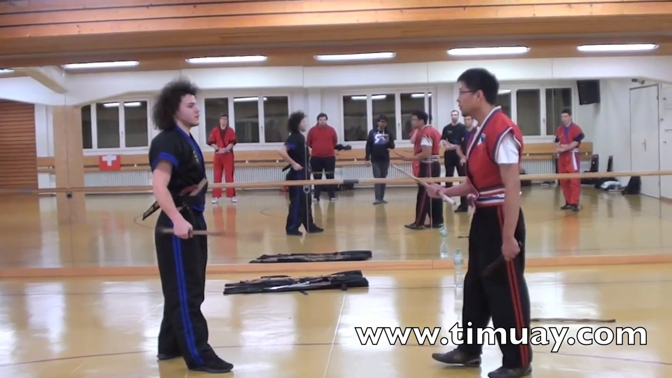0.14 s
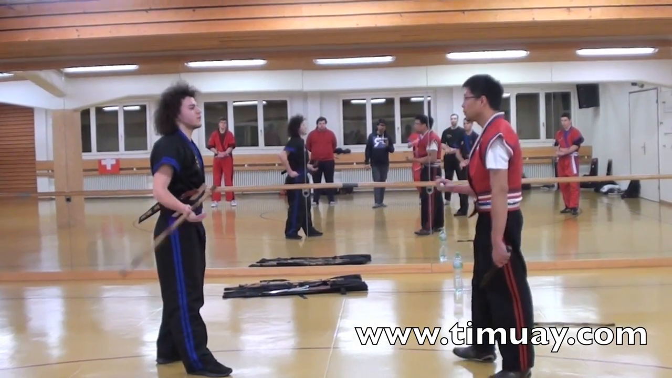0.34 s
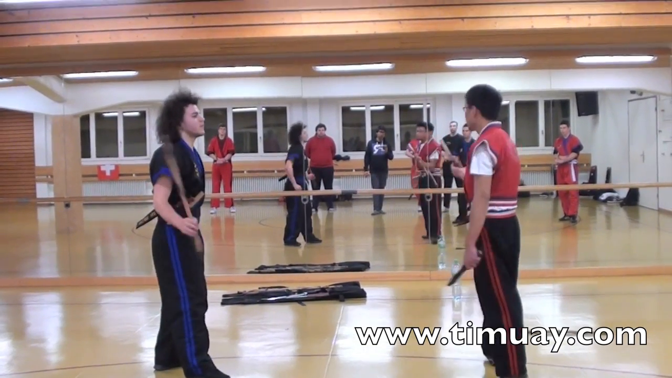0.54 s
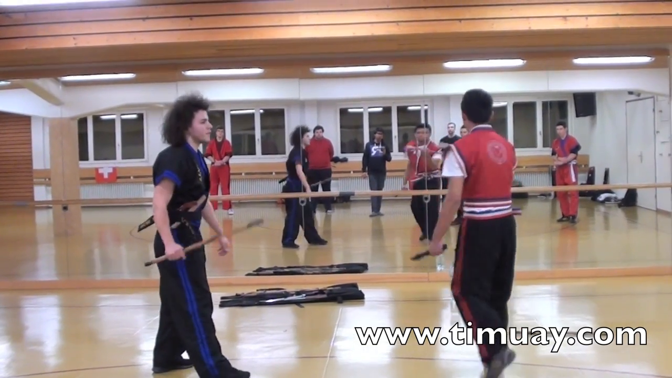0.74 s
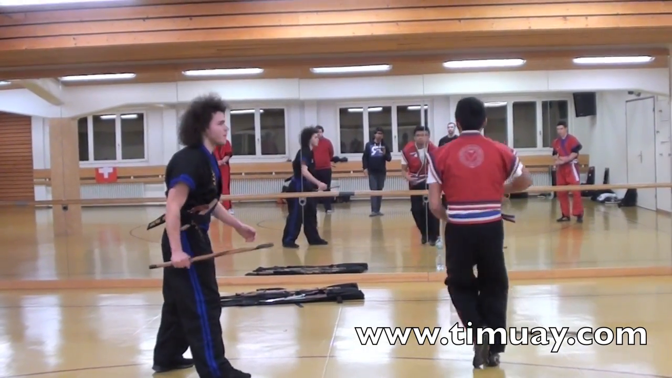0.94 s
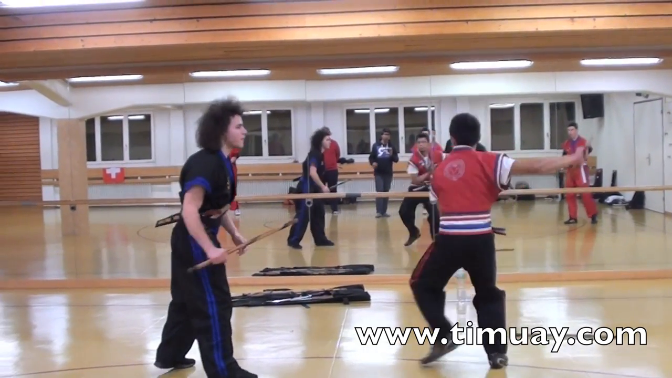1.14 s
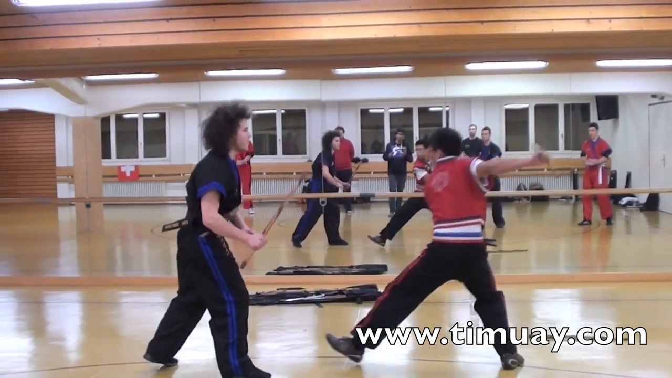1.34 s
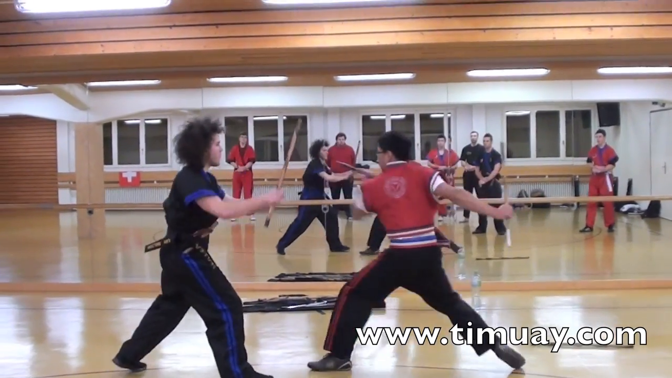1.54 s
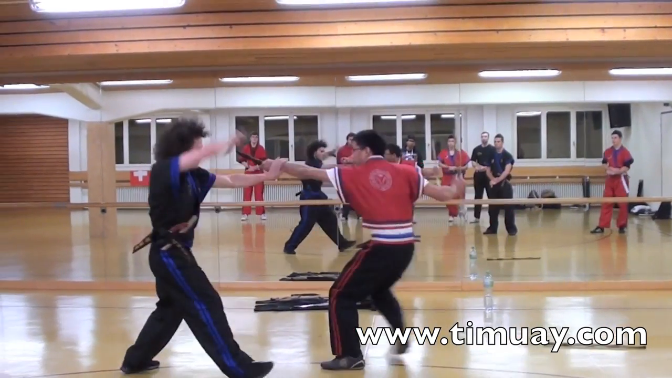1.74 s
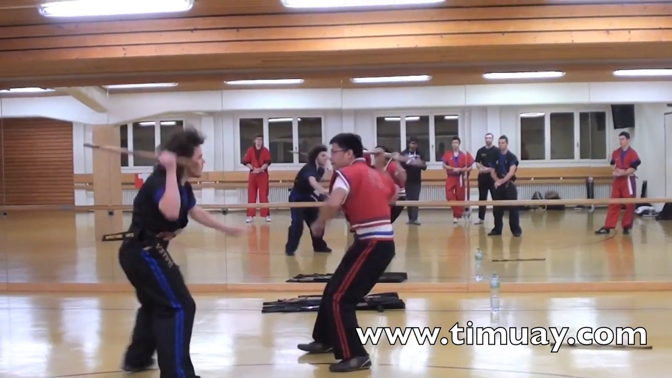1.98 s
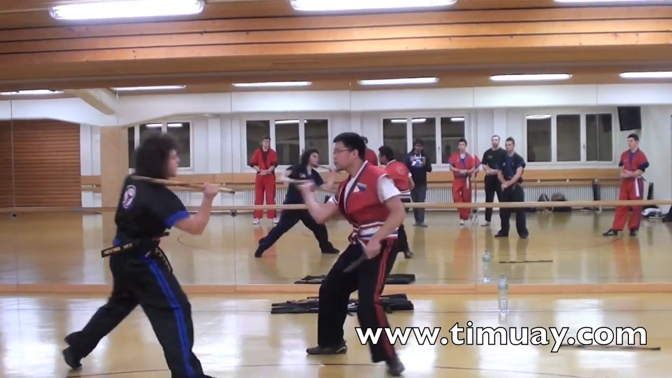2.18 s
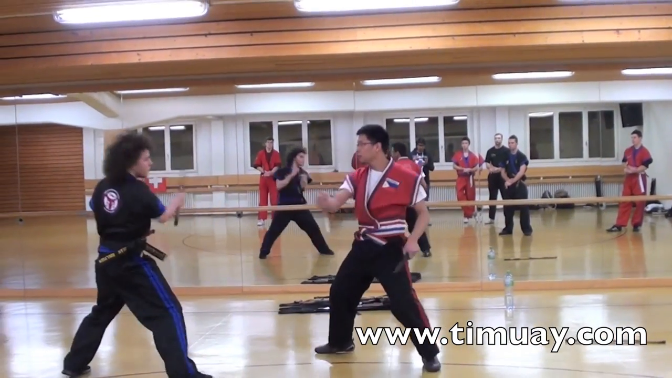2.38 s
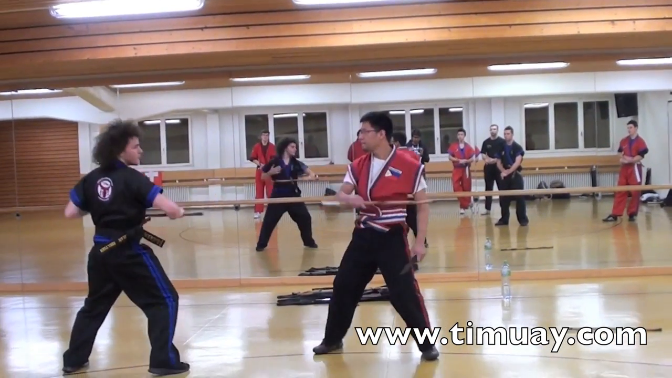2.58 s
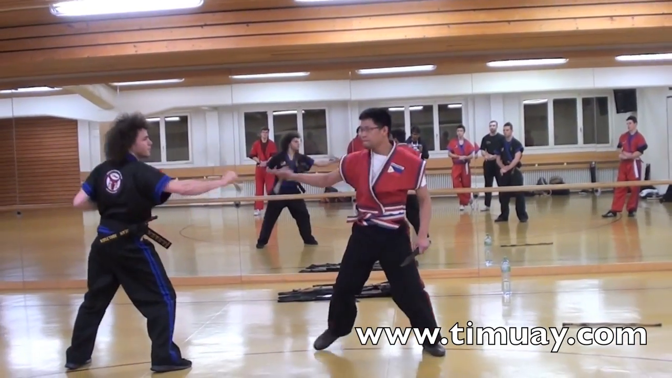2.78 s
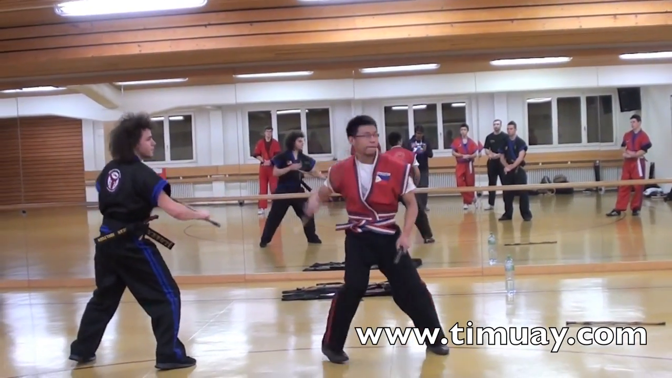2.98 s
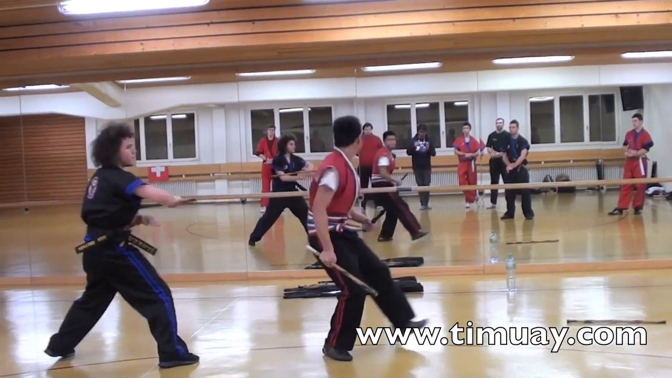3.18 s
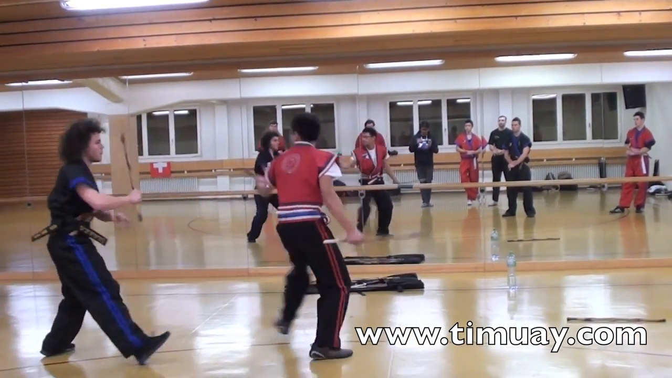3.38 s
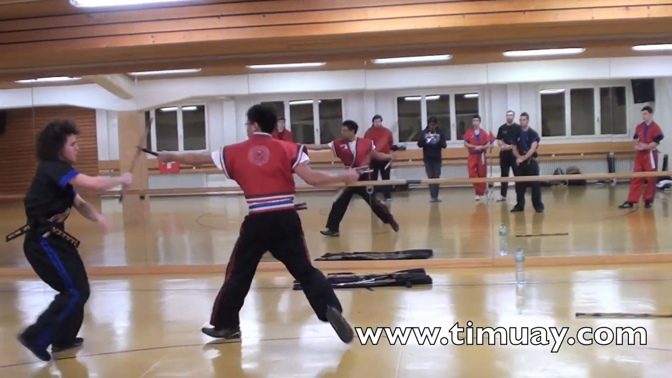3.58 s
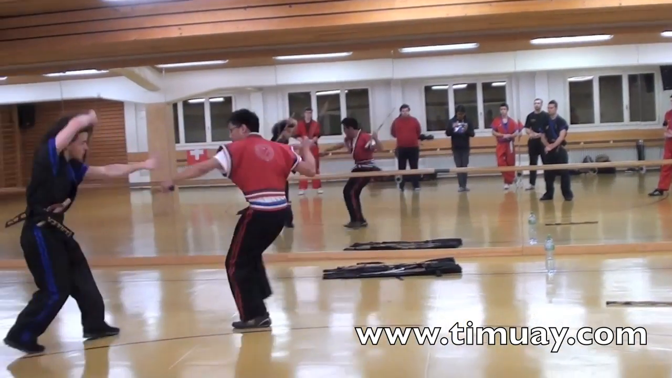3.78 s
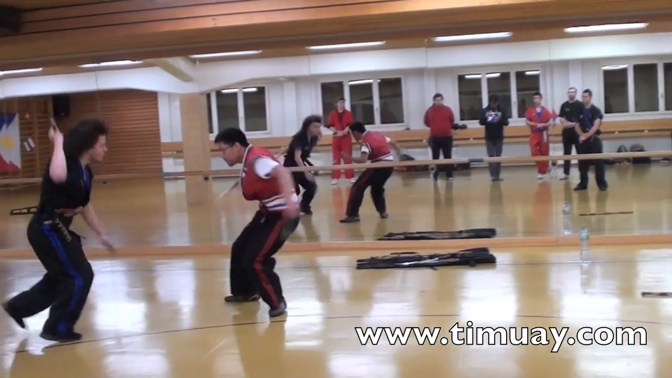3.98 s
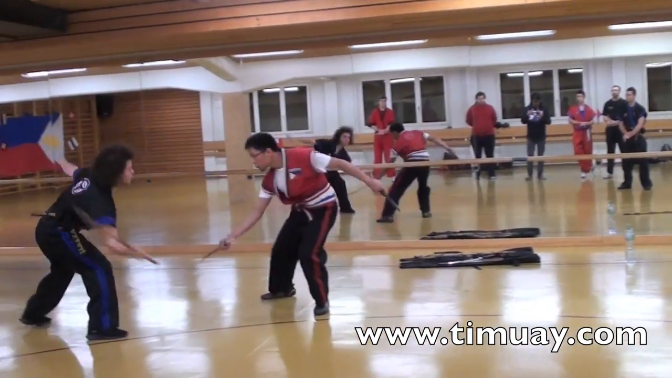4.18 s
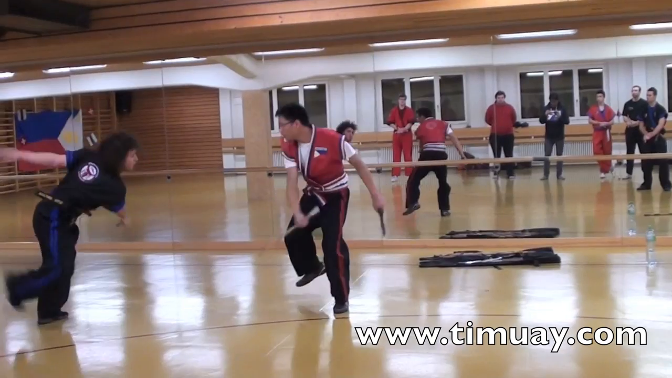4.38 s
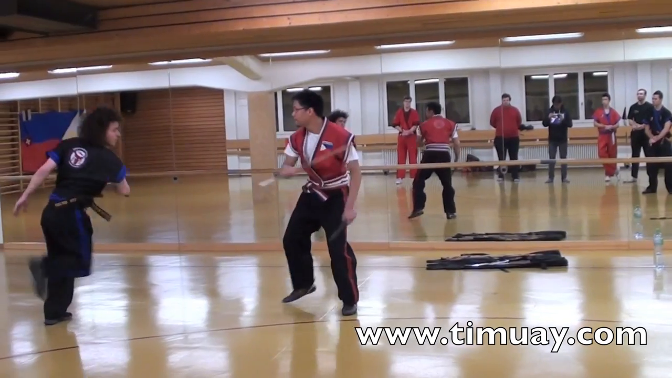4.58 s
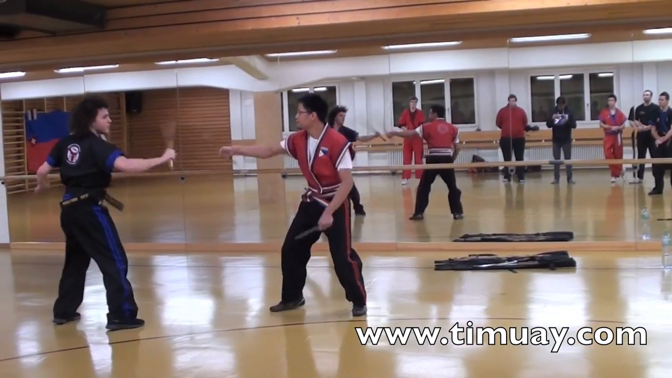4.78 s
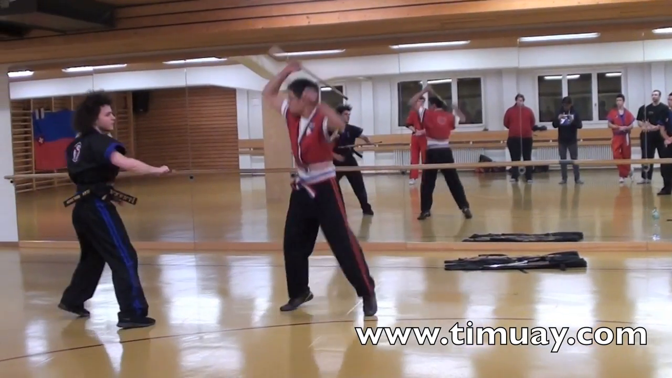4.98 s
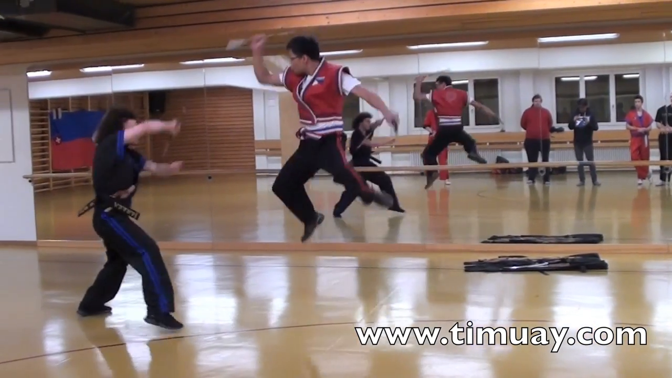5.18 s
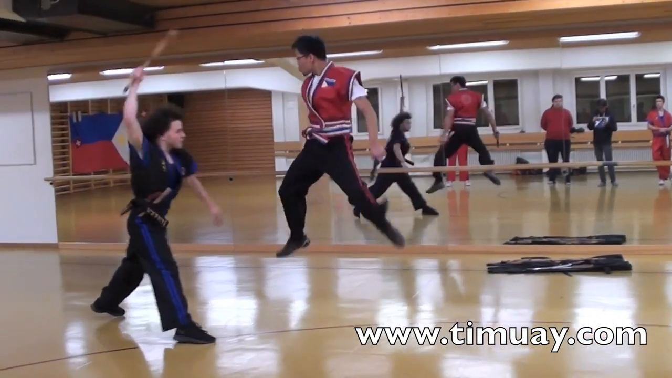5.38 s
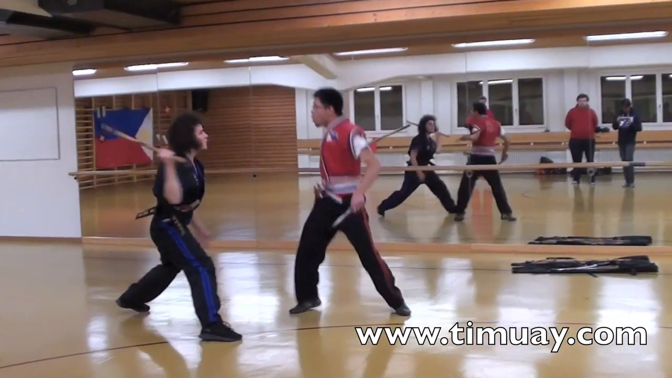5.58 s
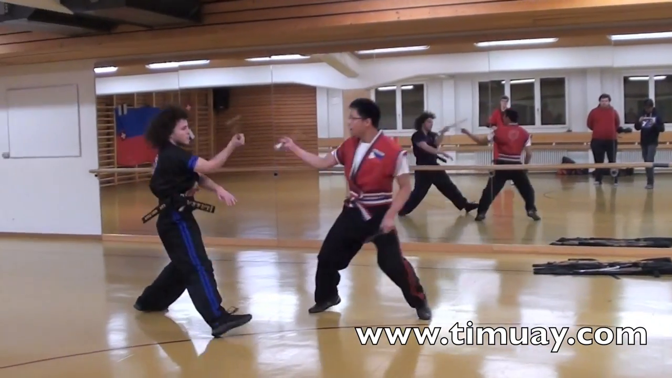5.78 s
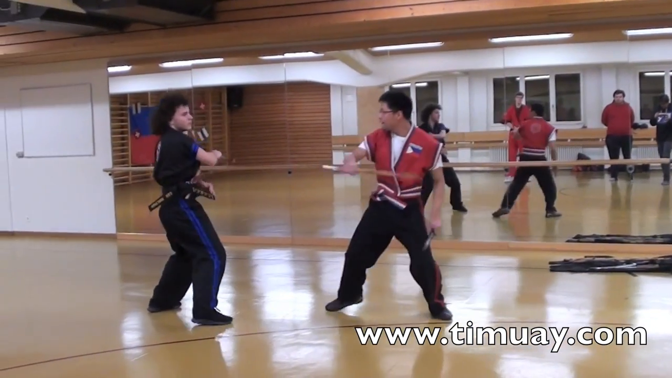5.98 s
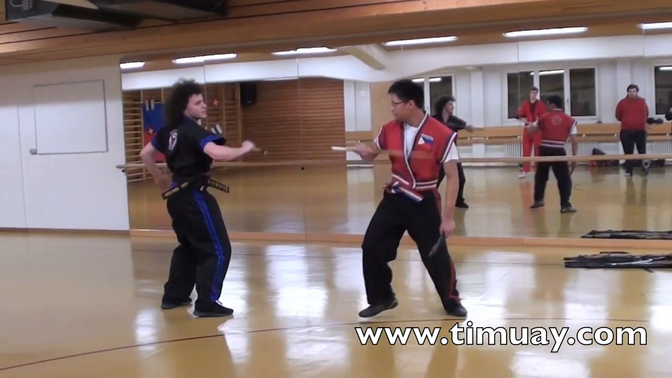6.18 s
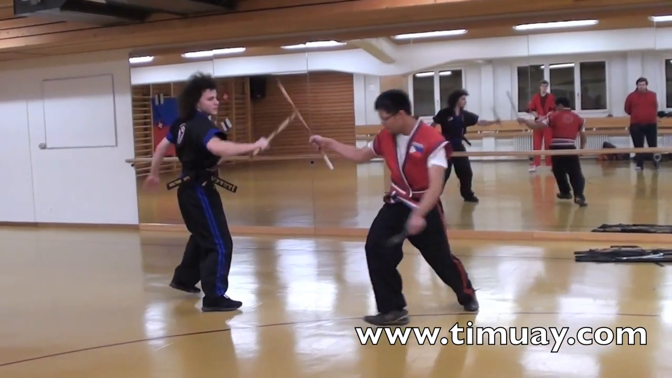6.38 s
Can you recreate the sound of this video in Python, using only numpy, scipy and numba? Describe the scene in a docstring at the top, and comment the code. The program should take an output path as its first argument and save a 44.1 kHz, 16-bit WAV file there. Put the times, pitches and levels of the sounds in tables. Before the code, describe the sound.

Wooden sticks clash in sharp, separate cracks that ring through a large hall, while feet thud and shuffle on a sprung floor over faint ventilation.

```python
"""Two fighters spar with wooden sticks in a large sports hall, heard in stereo from a camera a few metres away.
Ventilation and rustling clothes come first; a footfall and the first clash follow at about 1 s.
Until nearly 6 s the sticks crack and ring, while feet thud and soles slap on the sprung floor;
the heaviest step lands near 4.8 s, a flurry of feet near 5.6 s, and the rustle sinks at the end.
Each blow is noise shaped to a spectrum; the hall rings on, and the camera turns down the loud clashes."""
import sys
import numpy as np
from scipy import signal
from scipy.fft import rfft, irfft
from scipy.io import wavfile
from scipy.ndimage import uniform_filter1d, minimum_filter1d
from numba import njit

SR = 44100
rng = np.random.default_rng(int(sys.argv[2]) if len(sys.argv) > 2 else 0)


def dump_mix(stems):
    """Bounce the given channels to the path in sys.argv[1] as a 16-bit WAV at rate SR."""
    frames = np.atleast_2d(stems).T  # one column per channel
    limited = np.clip(frames, -1, 1)  # hard clip at full scale
    pcm = np.round(limited * 32767).astype(np.int16)
    wavfile.write(sys.argv[1], SR, pcm)


N = 283563
HIT_SIZE = 8192  # length of one dry blow (samples)


def sticks(hall):
    """Wood meets wood: a crack, and the bending modes of both sticks ring briefly in the hand."""
    # clashes, and one strong early echo at 1.855 s:
    # t/s, crack level/dB, first stick's ring level/dB, second stick's ring level/dB,
    # contact point on first and on second stick (share of length), upper corner f/Hz, lower corner f/Hz,
    # hall level/dB
    clashes_and_echo = [(1.0982, -9, -8.5, -21.5, 0.055, 0.036, 6050, 1990, 1),
                        (1.834, -26, -21, -21, 0.16, 0.36, 4140, 950, -5),
                        (1.855, -23, -26.5, -32, 0.18, 0.6, 3500, 950, -5.5),
                        (2.4237, -0.5, -19.5, -9, .39, 0.049, 7300, 930, 2.5),
                        (2.9242, -5.5, -11.5, -7.5, 0.26, 0.07, 7660, 1024, 1.5),
                        (3.183, -10.5, -15, -13.5, 0.14, .38, 7000, 537, -1),
                        (3.708, -26, -17, -22, 0.483, 0.257, 8550, 850, 1),
                        (4.3771, -1, -28, -5, .06, 0.34, 7060, 990, 2),
                        (4.903, -0.5, -15, -11.5, 0.056, 0.23, 6760, 960, 1),
                        (5.9337, -4.5, -14.5, -8.5, .26, 0.25, 8600, 930, 2)]
    # bending modes from the third upwards: f/Hz, level/dB before the contact point weights it, t60/s
    first_stick = [(788, -12, 0.069), (1346, 3, 0.024), (2170, 4.5, 0.019), (3050, -8, 0.036),
                   (4040, 0.5, 0.0079), (5350, 3, 0.0039), (7270, -11, 0.0045)]
    second_stick = [(894, -8, 0.027), (1785, 5, 0.013), (2360, 4.5, 0.025), (2950, 4, 0.0036),
                    (3510, -1.5, 0.011), (4500, -5, 0.0079), (6160, -15, 0.0082)]
    # spectrum of the crack of wood on wood: f/Hz, level/dB
    crack = [(100, 15), (450, -8.5), (680, -12), (880, -7), (1300, -8.5), (1550, -11.5), (2200, -2),
             (5000, 0), (6500, -1), (8000, -0.5), (10000, -5.5), (13000, -10), (16000, -15)]
    out = np.zeros((2, N))
    for s, crack_db, first_db, second_db, first_place, second_place, soft_hz, low_hz, far_db in clashes_and_echo:
        parts = [(crack_db, spectrum(crack)),
                 (first_db, ring(struck_at(first_stick, first_place))),
                 (second_db, ring(struck_at(second_stick, second_place)))]
        power = sum(undb(db) ** 2 * excite(part, low_hz, soft_hz) for db, part in parts)
        add(out, s, hall(contact(power, t60=0.018), far_db))
    return out


def struck_at(modes, place):
    """A free bar's modes as one contact point excites them: those with a node there stay nearly silent."""
    shape = np.cos(np.pi * ((np.arange(len(modes)) + 3.5) * place + 0.25))
    weight_db = 10 * np.log10(0.04 + shape ** 2)
    return [(hz, db + weight, t60) for (hz, db, t60), weight in zip(modes, weight_db)]


def feet(hall):
    """Heel, then toe, thud on the sprung floor and set the boards ringing."""
    # firm footfalls and landings: t/s, level/dB
    firm_steps = [(1.006, -44.5), (1.823, -35), (2.03, -39), (2.272, -37.5), (2.645, -40), (3.183, -38.5),
                  (3.59, -39), (3.646, -40), (3.922, -42.5), (4.04, -43.5), (4.324, -39.5), (4.776, -21),
                  (5.17, -39.5), (5.607, -32.5), (5.645, -29.5), (5.706, -31.5), (5.937, -32)]
    # modes of the sprung wooden floor: f/Hz, level/dB, t60/s
    board_modes = [(224.3, -4, 0.28), (274, 1, 0.11), (410, -17, 0.17), (1060, -7, 0.036)]
    # spectrum of a sole's thud: f/Hz, level/dB
    thud = [(30, -22), (80, -2.5), (150, -1.5), (300, 5), (550, -1.5), (900, -1), (2000, -5.5),
            (4000, -20.5), (16000, -49)]
    toe_delay_s, toe_db = 0.018, -9  # the ball of the foot comes down just after the heel
    # the harder a foot lands, the more the boards boom: growth in dB per dB above or below the reference step
    boom_db, reference_step_db, boom_growth = -4, -29.5, 0.3
    out = np.zeros((2, N))
    sole = excite(spectrum(thud), low_hz=50, soft_hz=6030)
    boards = ring(board_modes)
    for s, db in firm_steps + shuffles():
        board_db = boom_db + boom_growth * (db - reference_step_db)
        power = sole + undb(board_db) ** 2 * boards
        heel, toe = (contact(power, t60=0.049) for _ in range(2))
        step = heel + undb(toe_db) * later(toe, toe_delay_s)
        add(out, s, hall(undb(db) * step, far_db=-1))
    return out


def shuffles():
    """Light steps at an uneven pace, firmer when the fighters move briskly: rows of (s, dB)."""
    start_s, mean_gap_s = 1.3, 0.19
    over_motion_db, scatter_db = -2, 0.8
    chance = rng.standard_normal((40, 2))
    times = start_s + mean_gap_s * (np.arange(len(chance)) + 0.25 * chance[:, 0])
    levels_db = motion_db(times) + over_motion_db + scatter_db * chance[:, 1]
    return list(np.column_stack([times, levels_db])[times < N / SR])


def snaps(hall):
    """Soles, cloth and wood slap or graze: a surface catches and slips in ever weaker, very short snaps."""
    # slaps and grazes: t/s, snaps in the run, first snap level/dB, fall per snap/dB,
    # lower corner f/Hz, hall level/dB
    grazes = [(1.007, 1, -48.5, 3, 3000, -1), (1.8082, 4, -20, 4.5, 5400, -3.5),
              (4.042, 1, -44, 3, 1950, 2), (4.7752, 1, -21, 5.5, 2430, -2.5), (5.609, 3, -44, 5, 4550, 6),
              (5.6428, 6, -29.5, 0.3, 1300, -5.5), (5.7062, 2, -24.5, 12, 1200, -6.5),
              (5.721, 2, -36.5, 9, 800, -2)]
    # spectrum of a snap: f/Hz, level/dB
    snap = [(200, -4), (2000, 7.5), (4500, 1.5), (7000, 8.5), (9000, 5), (11000, -4.5), (16000, -10)]
    slip_s, slip_jitter = 0.0048, 0.35  # time between snaps, and its unevenness as a share
    out = np.zeros((2, N))
    for s, count, db, fall_db, low_hz, far_db in grazes:
        power = excite(spectrum(snap), low_hz, soft_hz=11400)
        run, delay = 0, 0
        for k in range(round(count)):
            run = run + undb(db - k * fall_db) * later(contact(power, t60=0.0027), delay)
            delay += slip_s * (1 + slip_jitter * rng.uniform(-0.91, 1))
        add(out, s, hall(run, far_db))
    return out


def clothes():
    """Cloth and shuffling shoes rustle: noise whose level follows the motion and flutters."""
    # spectrum of the rustle: f/Hz, level/dB
    rustle = [(60, -3), (250, 1.5), (500, -2.5), (1200, -2.5), (2300, -4), (4000, -10.5), (8000, -6.5),
              (11000, -19.5), (16000, -34)]
    flutter_db = 2.2 * walk(rate=25) + 1.8 * walk(rate=160)
    return diffuse(rustle) * undb(motion_db(np.arange(N) / SR) + flutter_db)


def motion_db(s):
    """How briskly the fighters move at a time, as the level of their rustle."""
    # rise and fall of the motion: t/s, level/dB
    motion = [(0, -56), (0.55, -52.5), (0.95, -54.5), (1.3, -47), (2.9, -50), (4.05, -43), (5.4, -50),
              (5.9, -44), (6.43, -57)]
    return np.interp(s, *np.transpose(motion))


def ventilation():
    """Steady air and microphone hiss as shaped noise, with a faint fan hum of phase-wavering sines."""
    # spectrum of air and hiss: f/Hz, level/dB
    air = [(20, -41), (45, -6.5), (75, -9), (120, -2), (200, -6), (310, -2.5), (450, -16), (900, -14.5),
           (2600, -23), (5000, -21), (8300, -22.5), (11000, -23), (16000, -26)]
    # hum of the ventilation: f/Hz, level/dB
    hum_tones = [(77, -65), (148, -62.5), (204, -62)]
    t = np.arange(N) / SR
    hum = 0
    for hz, db in hum_tones:
        phase = 2 * np.pi * hz * t + 1.33 * walk(rate=14)
        hum = hum + undb(db) * np.sqrt(2) * np.sin(phase)
    return undb(-53) * diffuse(air) + hum


def diffuse(points):
    """Noise of a given spectrum from all round, with its own stereo width in each band."""
    # width of the steady sounds: f/Hz, side minus mid level/dB
    stereo_width = [(60, -31), (110, -24), (200, -26), (380, -12.5), (700, -7), (2400, -7.5), (4400, -10.5),
                    (8100, -22), (15000, -44)]
    hz = freqs(N)
    mid, side = rfft(rng.standard_normal((2, N))) * undb(curve_db(points, hz))
    side = side * undb(curve_db(stereo_width, hz))
    pair = irfft([mid + side, mid - side], N)
    return pair / pair.std()


def make_hall(build_s, wander, spread):
    """The hall as a function of a blow: direct sound, first echoes and a decaying noise tail in each band."""
    # reverberation: f/Hz, t60/s, level/dB, side minus mid level/dB
    hall_bands = [(100, 0.84, 5, -41), (272, 0.39, -1, -43), (475, 0.48, 2.5, -20), (920, 0.73, 3.5, -16),
                  (2073, 0.87, 3, -11.5), (3550, 0.84, 4.5, -12), (4640, 0.78, 3, -13.5),
                  (7600, 0.62, 1.5, -13.5), (9200, 0.58, 0, -51), (15000, 0.26, 2, -35)]
    # first echoes off floor, mirror wall and ceiling: delay t/s, level/dB
    first_echoes = [(.0058, -8.5), (0.0107, -9.5), (.021, -8.5), (.032, -15)]
    tail_size = 49152  # samples
    centres, t60, wet_db, side_db = np.transpose(hall_bands)
    t, hz = np.arange(tail_size) / SR, freqs(N)
    # neighbouring bands cross over on a log-frequency axis
    shares = np.array([np.interp(np.log(hz + 1), np.log(centres), row) for row in np.eye(len(hall_bands))])
    bands = irfft(rfft(rng.standard_normal((2, 1, N))) * shares, N)
    # reflections thicken at first, then die away at each band's own pace
    fade = (1 - np.exp(-t / build_s)) * np.exp(-np.log(1000) * t / t60[:, None])
    fade *= (undb(wet_db) / np.linalg.norm(fade, axis=1))[:, None]
    side_fade = fade * undb(side_db)[:, None]

    def hall(blow, far_db):
        """Place one blow in the hall, with its own random stretch of the tail."""
        start = rng.integers(N - tail_size)
        mid_bands, side_bands = bands[:, :, start:start + tail_size]
        mid = undb(far_db) * np.einsum('bt,bt->t', mid_bands, fade)
        side = undb(far_db) * np.einsum('bt,bt->t', side_bands, side_fade)
        mid[0] += 1  # direct sound
        for delay, db in first_echoes:
            mid[int(delay * SR * (1 + wander * rng.uniform(-1, 1)))] += undb(db + far_db)
        # a blow off to one side reaches one microphone a fraction of a sample sooner
        side += spread * rng.choice([-1, 1]) * np.diff(mid, prepend=0)
        return signal.fftconvolve(np.array([mid + side, mid - side]), blow[None], axes=1)
    return hall


def contact(power, t60):
    """A blow with this power spectrum, scattered over time as rough surfaces press together and part."""
    t = np.arange(HIT_SIZE) / SR
    envelope = np.sqrt(t) * np.exp(-np.log(1000) * t / t60)
    scatter = rfft(rng.standard_normal(HIT_SIZE) * envelope)
    # even out the scatter's own spectrum, with a floor under its dips
    ripple = np.hypot(np.abs(scatter), 0.2 * np.abs(scatter).mean())
    blow = irfft(scatter * causal(np.sqrt(power) / ripple))
    return np.sqrt(power.sum()) * unit(blow)


def ring(modes):
    """Power spectrum of decaying modes: the shorter the decay, the wider the resonance."""
    centre, db, t60 = np.transpose(modes)[:, :, None]
    hz, width = freqs(HIT_SIZE), np.log(1000) / (np.pi * t60)
    peaks = 1 / ((hz ** 2 - centre ** 2) ** 2 + (width * centre) ** 2)
    power = np.sum(undb(db) ** 2 * peaks / peaks.sum(axis=1, keepdims=True), axis=0)
    return power / power.sum()


def excite(power, low_hz, soft_hz):
    """The share of a body's spectrum that a blow wakes: a soft one is dull, a glancing one thin."""
    hz = freqs(HIT_SIZE) + 1
    woken = power / ((1 + (hz / soft_hz) ** 6) * (1 + (low_hz / hz) ** 4))
    return woken / woken.sum()


def spectrum(points):
    """Power spectrum of (Hz, dB) points."""
    return undb(curve_db(points, freqs(HIT_SIZE))) ** 2


def causal(gain):
    """The most prompt (minimum-phase) response that has this gain per frequency."""
    cepstrum = irfft(np.log(gain + 1e-9))
    cepstrum[1:HIT_SIZE // 2] *= 2
    cepstrum[HIT_SIZE // 2 + 1:] = 0
    return np.exp(rfft(cepstrum))


def unit(x):
    """Scale a blow to the energy of 10 ms at full level."""
    return x / np.sqrt(np.sum(x ** 2) / (SR / 100))


def walk(rate):
    """Smoothed random drift about zero, with new values at this rate (Hz)."""
    hold = int(SR / rate)
    return uniform_filter1d(np.repeat(rng.standard_normal(N // hold + 1), hold), hold)[:N]


def curve_db(points, hz):
    """A spectrum of (Hz, dB) points, read on a log-frequency axis."""
    f, db = np.transpose(points)
    return np.interp(np.log(hz + 1), np.log(f), db)


def freqs(size):
    """Frequencies (Hz) of the bins of a transform."""
    return np.fft.rfftfreq(size, 1 / SR)


def undb(db):
    """Decibels to gain."""
    return 10 ** (np.asarray(db) / 20)


def later(blow, s):
    """A blow delayed a little."""
    return np.pad(blow, (max(int(s * SR), 0), 0))[:len(blow)]


def add(out, s, sound):
    """Mix a sound in at a time."""
    i = int(s * SR)
    out[:, i:i + sound.shape[1]] += sound[:, :N - i]


def scene():
    """The sparring over the steady air of the hall."""
    hall = make_hall(build_s=0.0077, wander=0.1, spread=0.014)
    return sticks(hall) + feet(hall) + snaps(hall) + clothes() + ventilation()


@njit
def follow(x, attack, release):
    """Follow a level up and down, each at its own rate (share of the gap per sample)."""
    y, level = np.empty(len(x)), 0.
    for i in range(len(x)):
        level += (x[i] - level) * (attack if x[i] > level else release)
        y[i] = level
    return y


def gain_control(x, threshold_db, attack_s, release_s):
    """Turn the gain down by as much as the smoothed level exceeds the threshold."""
    power = uniform_filter1d(np.mean(x ** 2, axis=0), size=96)
    excess_db = np.maximum(10 * np.log10(np.abs(power) + 1e-12) - threshold_db, 1e-9)
    cut_db = follow(excess_db, min(1 / (attack_s * SR), 1), min(1 / (release_s * SR), 1))
    return x * undb(-cut_db)


def limiter(x, ceiling):
    """Catch the peaks that slip past the gain control."""
    gain = ceiling / np.maximum(np.abs(x).max(axis=0), ceiling)
    return x * uniform_filter1d(minimum_filter1d(gain, size=33), size=33)


def record(dry):
    """The camera rides its gain, limits the peaks and cuts the treble above 16 kHz."""
    held = gain_control(dry, threshold_db=-11.0, attack_s=0.0006, release_s=0.049)
    limited = limiter(held, ceiling=0.69)
    low_pass = signal.ellip(10, 0.2, 80, 16000, fs=SR, output="sos")
    return signal.sosfilt(low_pass, limited)


dry = scene()
out = record(dry)
dump_mix(out)
```